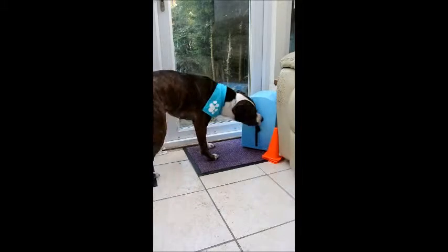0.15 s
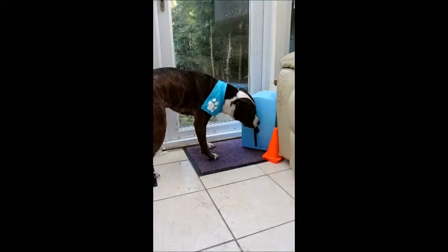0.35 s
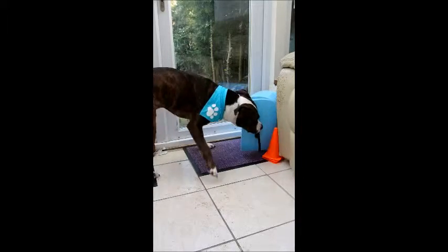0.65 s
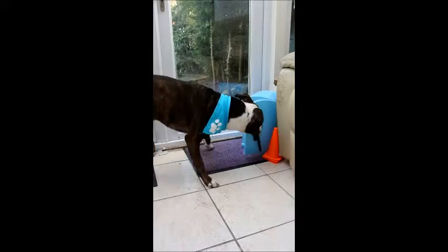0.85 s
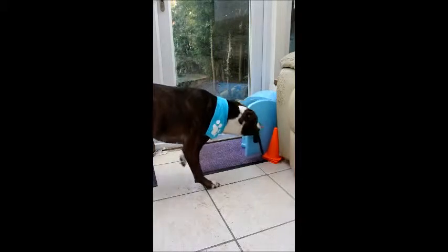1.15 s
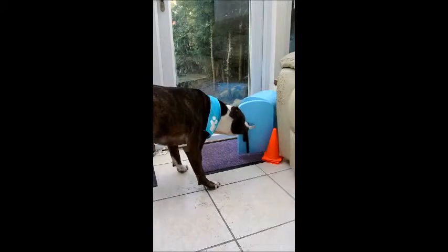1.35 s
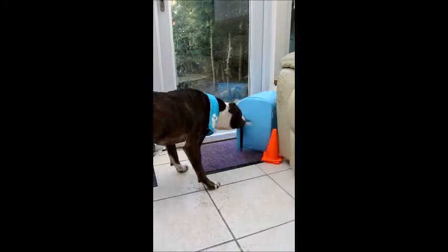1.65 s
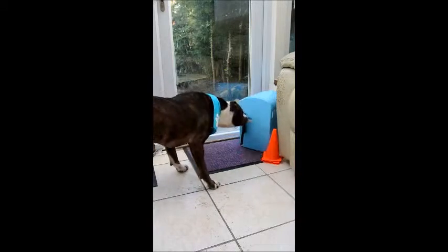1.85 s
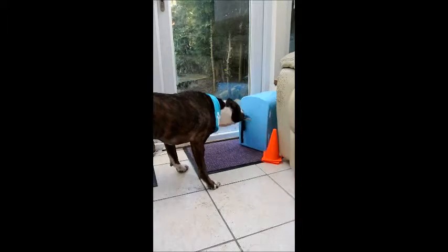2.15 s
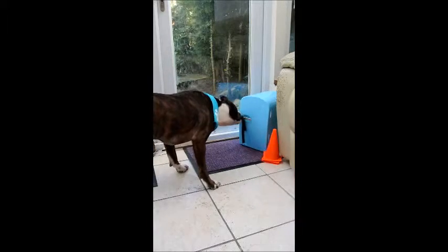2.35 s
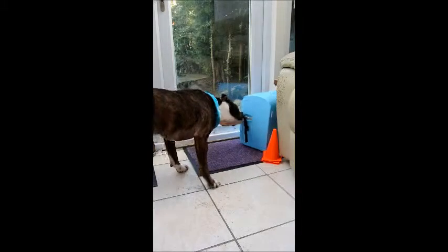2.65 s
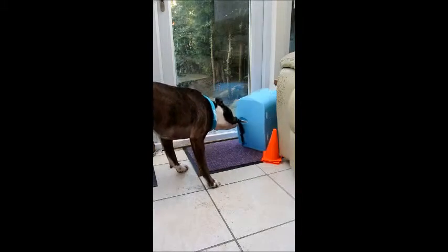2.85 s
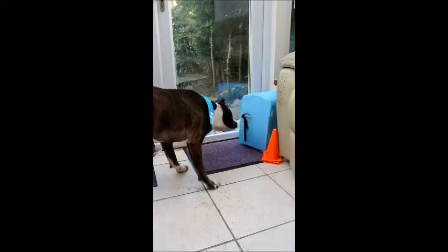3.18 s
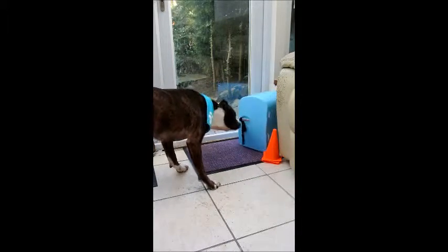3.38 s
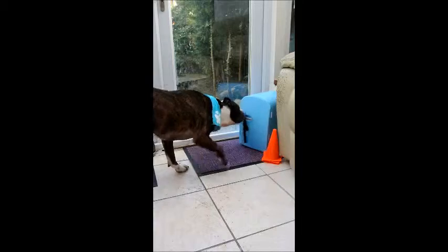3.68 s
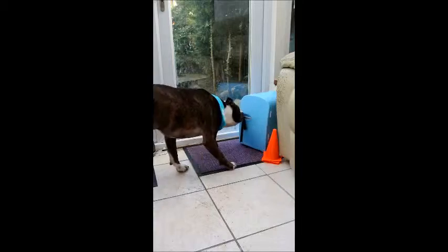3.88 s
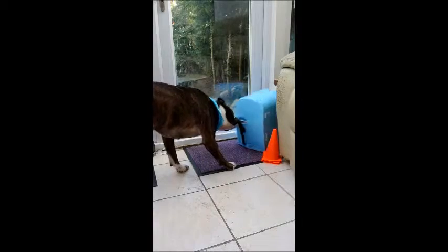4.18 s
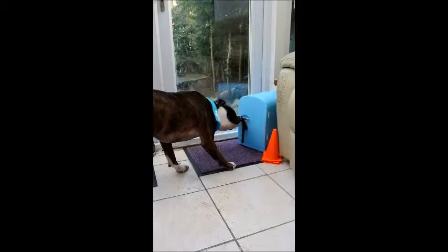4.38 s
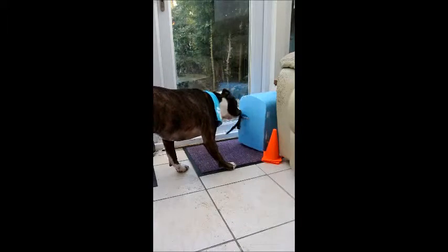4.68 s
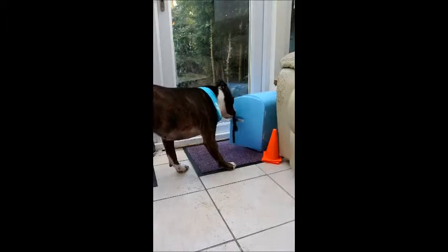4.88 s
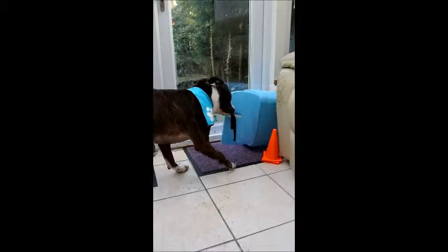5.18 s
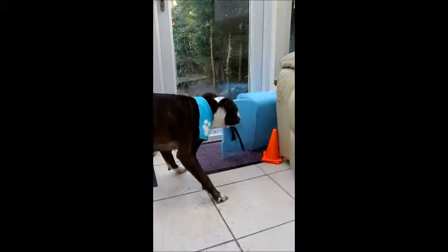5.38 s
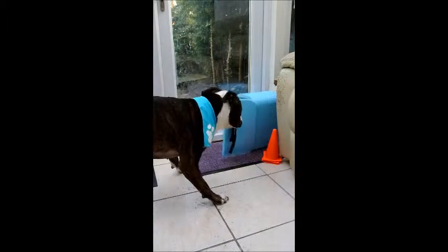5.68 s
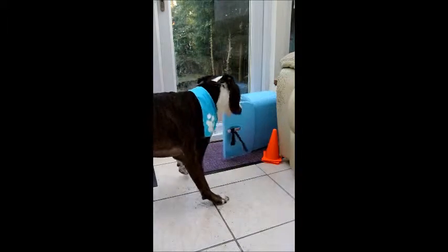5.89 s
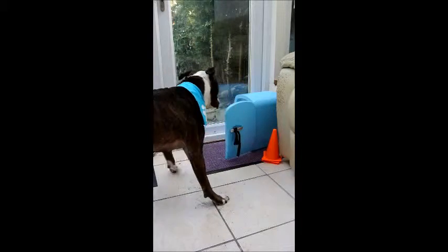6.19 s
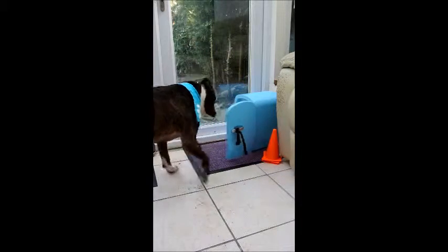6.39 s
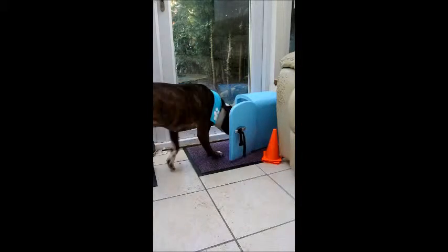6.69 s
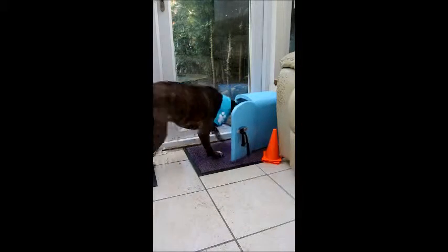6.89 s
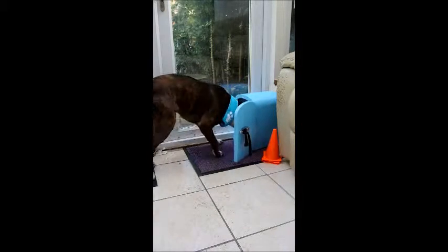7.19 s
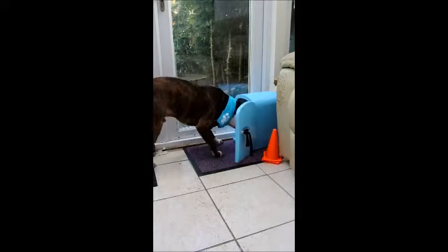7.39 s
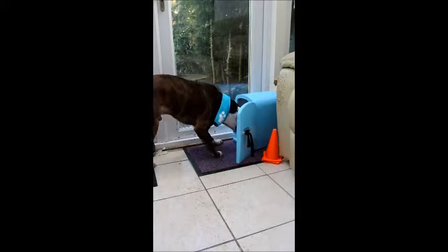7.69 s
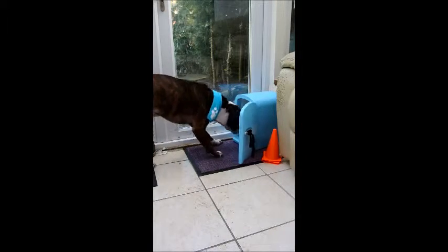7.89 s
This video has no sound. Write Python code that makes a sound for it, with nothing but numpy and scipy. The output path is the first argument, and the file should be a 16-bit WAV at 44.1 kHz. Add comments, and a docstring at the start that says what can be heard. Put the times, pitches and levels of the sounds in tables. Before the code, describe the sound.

A dog tugs at the door of a small plastic fridge, making irregular hollow knocks, thuds and short scrapes as it drags over a mat. Claws click on the tiles and paws brush softly across the mat. Near the end, the loudest knocks ring from inside the open fridge, with a few thin pings. A phone about two metres away picks up the hard room's reflections and a faint hiss.

```python
"""Hollow plastic knocks, thuds and scrapes: a dog tugs at the door of a small fridge in a tiled room.
Blows ring the shell and pulls drag it over its mat; the loudest land near the end, inside the open fridge.
Claws click on the tiles, paws and fur brush the mat, and a small hard part pings thinly.
Hard walls return every sound to a stereo phone two metres away, over a faint steady hiss."""
import sys
import numpy as np
from scipy import signal
from scipy.fft import rfft, irfft
from scipy.io import wavfile
from scipy.ndimage import uniform_filter1d

SR = 44100
rng = np.random.default_rng(int(sys.argv[2]) if len(sys.argv) > 2 else 0)


def dump(signal):
    """Clip the signal to [-1, 1] and save it as 16-bit WAV at the path in sys.argv[1]."""
    limited = np.clip(np.atleast_2d(signal).T, -1, 1)
    pcm = np.round(limited * 32767).astype(np.int16)
    wavfile.write(sys.argv[1], SR, pcm)


N = 354559


def knocks(walls):
    """A blow rings the fridge's upper modes, thuds in the lower ones and cracks on the plastic."""
    # Blows on the fridge. Each row: start in seconds, ring peak in dB, ring centre in Hz, thud in dB
    # against the ring, thud centre in Hz, crack in dB against the ring, damping factor of jaw and mat.
    blows = [(0.186, -30.5, 670, -10, 134, 6.5, 1.9), (0.326, -29.5, 495, 3, 148, -6, 0.84),
             (0.409, -19.5, 740, -3, 206, -6, 0.8), (0.524, -20, 835, 1, 233, -3.5, 0.99),
             (0.962, -31, 855, 9, 334, -2, 0.6), (1.227, -35.5, 487, 10, 298, 10, 1.1),
             (1.545, -20, 690, 0, 400, -17, 1.56), (1.84, -30.5, 520, 8.5, 194, -8, 1.1),
             (1.865, -20, 840, 9.5, 147, 9, 1.4), (1.88, -18.5, 440, 8.5, 408, 1, 2.06),
             (1.902, -23, 580, 3, 250, -7, 3.3), (2.177, -40.5, 640, 1, 153, 10, 1),
             (2.348, -31, 780, -8, 156, -5, 0.59), (2.556, -32, 610, 11.5, 168, -8, 1.4),
             (3.053, -16, 944, -1, 173, 4.5, 0.77), (3.201, -18.5, 680, -5, 367, 9, 1.7),
             (3.225, -33.5, 506, 15, 330, 22, 0.98), (3.324, -16, 526, -8.5, 156, -9, 0.92),
             (3.599, -26.5, 595, -14, 151, 3.5, 1.4), (3.783, -19.5, 900, -17, 191, 4.5, 1.2),
             (4.363, -21.5, 700, -1, 443, -4.5, 1.0), (4.382, -16, 533, -8, 156, 0.5, 1.6),
             (4.478, -31.5, 1070, -8, 118, 9, 1), (4.556, -17.5, 600, -12, 313, -9, 1.6),
             (4.713, -36.5, 530, 5, 151, -9, 0.31), (4.772, -15, 517, 3, 165, 3, 1.2),
             (4.994, -34, 595, 7, 380, 4, 1.3), (5.246, -9.5, 780, -10.5, 340, -3, 0.83),
             (5.269, -9.5, 730, -28, 326, -13, 1.7), (5.345, -26, 880, 2, 300, -4, 0.67),
             (5.867, -25, 870, -7, 306, -3, 1.3), (6.766, -27.5, 810, -27, 371, -18, 1.2),
             (6.864, -50, 533, 17, 156, -4, 0.85), (6.957, -33, 860, -3, 216, 9.5, 0.69),
             (7.145, -34, 446, -9, 300, 0.5, 0.57), (7.185, -21.5, 880, -31, 223, 1, 0.71),
             (7.196, 4.5, 734, -12.5, 378, -20, 1.9), (7.482, -18.5, 716, -22, 375, -31, 0.99),
             (7.49, 3, 796, -15.5, 356, -8, 1.57), (7.752, -22.5, 670, -8, 330, 7, 0.14),
             (7.92, -28.5, 720, -1, 303, 5, 0.8)]
    crack_hz = 2100
    inside_s, hollow_db = 7.16, 13.5  # from here on, blows land inside and the hollow rings louder
    out, t = np.zeros((2, N)), np.arange(int(.3 * SR)) / SR

    def plastic(x):
        return band(x, 850, 3120) + 0.43 * band(x, 0.85 * crack_hz, 0.995 * crack_hz)

    for start, db, hz, thud_db, thud_hz, crack_db, damping in blows:
        length = 1 / max(damping, .4)
        shell = ring(t, hz, octaves=0.44, length=length, hollow_db=hollow_db * (start > inside_s))
        thud = ring(t, thud_hz, octaves=0.92, length=0.91 * length)
        body = unit(shell) + undb(thud_db) * unit(thud)
        add(out, start, room(walls, undb(db) * body, wet_db=-4))
        add(out, start, undb(db + crack_db) * contact(walls, plastic, t60=0.057, wet_db=1.27))
    return out


def ring(t, centre_hz, octaves, length, hollow_db=0):
    """The fridge's modes ring out; the place of contact favours those near one pitch."""
    # Modes of the fridge. Each row: pitch in Hz, relative level in dB, and seconds to fall 60 dB,
    # which length then scales.
    modes = [(87, -4, 0.12), (118.6, -3, 0.12), (156, -1, 0.26), (199, -3.5, 0.14), (245, 1, 0.04),
             (306.3, 2, 0.1), (317.5, -3.5, 0.13), (353.7, 3, 0.083), (428, -8, 0.27), (493, -3.5, 0.15),
             (537, 0, 0.04), (595, -6, 0.32), (636.7, -7.5, 0.21), (677, -8, 0.1), (788.3, 1.5, 0.099),
             (869.7, -2, 0.1), (944, 5.5, 0.053), (1070, 8, 0.085), (1200, 3.5, 0.31), (1353, 13, 0.13)]
    hollow_hz, hollow_octaves = 600, 0.14
    hz, db, t60 = np.transpose(modes)[:, :, None]
    db = db - 10 * (np.log2(hz / centre_hz) / octaves) ** 2
    db = db + 1.5 * rng.standard_normal(hz.shape)  # no two contacts sound alike
    db = db + hollow_db * np.exp(-(np.log2(hz / hollow_hz) / hollow_octaves) ** 2)
    sign = rng.choice([-1, 1], hz.shape)
    audible = db[:, 0] > db.max() - 45
    hz, db, t60, sign = (column[audible] for column in (hz, db, t60, sign))
    attack = sign * np.minimum(t * hz, 1)  # the swing builds up over one cycle
    return np.sum(undb(db) * attack * fade(t, t60 * length) * np.sin(2 * np.pi * hz * t), axis=0)


def claws(walls):
    """A hard tip on glazed tile: a brief bright chatter around its own pitch."""
    # Claws on tile and catch. Each row: start in seconds, dry peak in dB, centre in Hz,
    # gain of the low band in dB.
    clicks = [(0.187, -34.5, 6100, 5), (0.408, -18, 4850, 6), (0.7543, -8.5, 8700, -4.5),
              (0.524, -28, 6000, 3), (0.9596, -19.5, 5300, 6), (1.124, -12.5, 9200, -45),
              (1.131, -18, 9100, -35), (1.3271, -16, 7800, 4.5), (1.3398, -11.5, 5600, -32),
              (1.8419, -16.5, 7100, 5), (1.8682, -4, 4600, -5), (1.9035, 5, 10830, 5),
              (2.5556, -31, 9100, 9.5), (3.051, -9.5, 8240, 1), (3.201, -12.5, 4570, 11.5),
              (3.737, -44, 4710, 16), (3.7816, -19.5, 5970, -8), (4.384, -36, 5840, 1),
              (4.75, -30, 10900, 8.5), (4.773, -20, 5740, 5.5), (5.247, -32, 7500, -1),
              (5.341, -32, 6580, -20), (5.4002, -11, 8740, -35), (5.512, -35, 6000, -24),
              (5.5386, -32, 7050, -25), (6.246, -19.5, 5700, -6), (6.386, -24.5, 9200, -30),
              (6.679, -29, 6170, -20), (6.6997, -21.5, 8550, -21), (7.195, 0, 5170, 17.5),
              (7.4875, -6.5, 7400, 12.5), (7.6052, -7, 5500, 39), (7.763, 9, 5430, -2)]
    out = np.zeros((2, N))
    for start, db, hz, low_db in clicks:
        def tile(x):
            tick = 0.68 * band(x, 0.893 * hz, 1.063 * hz) + band(x, 0.58 * hz, 1.41 * hz)
            return tick + 0.85 * band(x, 5040, 11200) + undb(low_db) * band(x, 1230, 4280)

        wet_db = -1 - 0.4152 * db  # fainter claws are more hidden: more of them is room
        add(out, start, undb(db) * contact(walls, tile, t60=0.032, wet_db=wet_db))
    return out


def contact(walls, colour, t60, wet_db):
    """A brief chatter of touches; the walls blur it into one smooth burst of the same colour."""
    t = np.arange(1024) / SR
    touches = rng.standard_normal(len(t)) * (rng.random(len(t)) < .15) * fade(t, t60)
    touches[0] = 1.97  # a firm first hit
    click = unit(colour(touches))
    blur = colour(signal.unit_impulse(len(t)))
    blur *= np.sqrt(np.sum(click ** 2) / np.sum(blur ** 2))  # as much energy as the click
    return room(walls, click, wet_db, send=blur)


def drags(walls):
    """Stick-slip on the mat shakes the shell's modes and grates above them."""
    # Pulls that drag the fridge. Each row: start in seconds, hold in seconds, shell level in dB,
    # then grit and rumble, both in dB against the shell.
    pulls = [(0.218, 0.15, -41.5, -11, -5.5), (0.433, 0.03, -38.5, -4, 0), (0.592, 0.12, -51, -3, -0.5),
             (2.037, 0.025, -45.5, -0.5, -22), (2.193, 0.059, -40, -10.5, -9.5),
             (2.336, 0.033, -42.5, -2.5, -5), (3.214, 0.071, -33.5, 6.5, 2),
             (3.315, 0.045, -26.5, -9.5, -13), (3.603, 0.18, -38, -2.5, -13),
             (3.817, 0.056, -33.5, -9.5, -14), (4.401, 0.039, -32, -7.5, -6.5), (4.489, 0.03, -48, 12, 7),
             (4.578, 0.02, -32, -10.5, -7.5), (4.789, 0.034, -31, -8, 1.5), (4.86, 0.049, -37.5, -9, -6),
             (4.966, 0.062, -36.5, -11, -18), (5.073, 0.1, -49, -1, -0.5), (5.187, 0.027, -43.5, -3, -15),
             (5.257, 0.023, -25, -9, -11), (5.312, 0.15, -42.5, -0.5, -6.5), (5.524, 0.04, -44, -2.5, -7),
             (5.886, 0.018, -47, 2.5, -6), (5.972, 0.14, -48, -5, -4), (6.89, 0.17, -61, 8, -6),
             (7.799, 0.044, -26, -10, -26), (7.882, 0.024, -40, -2.5, -26)]
    out, t = np.zeros((2, N)), np.arange(int(.25 * SR)) / SR
    for start, hold, db, grit_db, rumble_db in pulls:
        begin, gain = stroke(start, hold, rise_db_s=1197, fall_db_s=260)
        size = len(gain)
        slips = rng.standard_normal((2, size)) * flutter(size, rate_hz=70, depth_db=2.5)
        shell = signal.fftconvolve(slips[0], ring(t, centre_hz=601, octaves=0.55, length=0.85))[:size]
        rumble = signal.fftconvolve(slips[1], ring(t, centre_hz=267, octaves=1, length=1))[:size]
        grit_hz = 2080 * 2 ** ((db + grit_db + 37.5) / 25)  # grit 25 dB louder grates an octave higher
        grit = rubbing(size, grit_hz, lowest_hz=900, focus_db=12, rate_hz=90, depth_db=3.5)
        scrape = level(shell, 0) + level(rumble, rumble_db) + undb(grit_db) * grit
        add(out, begin, room(walls, gain * undb(db) * scrape, wet_db=-5.5))
    return out


def brushes(walls):
    """Paws and fur sweep the mat, and the fine fibres rustle."""
    # Sweeps over the mat. Each row: start in seconds, hold in seconds, level in dB, # centre in Hz (each sweep
    # has its own).
    sweeps = [(0.0, 0.0038, -36.5, 6240), (0.094, 0.01, -55, 6000), (0.855, 0.075, -46.5, 6800),
              (2.614, 0.0091, -48, 6300), (2.722, 0.12, -44, 6170), (2.906, 0.1, -50.5, 6800),
              (3.686, 0.011, -43, 7140), (4.591, 0.074, -50.5, 6300), (4.861, 0.02, -47, 6200),
              (4.921, 0.039, -42, 7400), (5.019, 0.099, -51, 7000), (5.124, 0.045, -40, 8400),
              (5.702, 0.022, -47.5, 7300), (5.789, 0.023, -47, 7900), (6.049, 0.013, -52, 6500),
              (6.26, 0.04, -65, 6000), (6.456, 0.0055, -34.5, 8800), (6.732, 0.035, -41, 7400),
              (6.862, 0.022, -48.5, 6430), (7.135, 0.012, -47.5, 7000), (7.787, 0.045, -38, 4970)]
    out = np.zeros((2, N))
    for start, hold, db, hz in sweeps:
        begin, gain = stroke(start, hold, rise_db_s=451, fall_db_s=267)
        rustle = rubbing(len(gain), hz, lowest_hz=2830, focus_db=1.9, rate_hz=54, depth_db=0.49)
        add(out, begin, room(walls, gain * undb(db) * rustle, wet_db=0.095))
    return out


def stroke(start, hold, rise_db_s, fall_db_s):
    """Onset and envelope of one movement: it swells from -40 dB up to its start, holds, then dies away."""
    begin = max(start - 40 / rise_db_s, 0)
    t = np.arange(begin, start + hold + 40 / fall_db_s, 1 / SR)
    slopes_db = np.minimum(rise_db_s * (t - start), fall_db_s * (start + hold - t))
    return begin, undb(np.minimum(0, slopes_db))


def rubbing(size, centre_hz, lowest_hz, focus_db, rate_hz, depth_db):
    """Friction noise held at an even level: six bands flicker separately, strongest near the centre."""
    sound = 0
    for hz in lowest_hz * 2 ** np.arange(0, 3, .5):
        noise = level(band(rng.standard_normal(size), hz / 1.89, hz * 1.11), 0)
        weight = undb(-focus_db * np.log2(hz / centre_hz) ** 2)
        sound = sound + weight * noise * flutter(size, rate_hz, depth_db)
    return sound / np.sqrt(uniform_filter1d(sound ** 2, 2048))


def flutter(size, rate_hz, depth_db):
    """Uneven gain: friction catches and slips."""
    step = int(SR / rate_hz)
    jumps = np.repeat(rng.standard_normal(size // step + 1), step)[:size]
    return undb(depth_db * uniform_filter1d(jumps, step))


def pings(walls):
    """A small hard part, perhaps a collar tag, rings with one thin fading tone."""
    # Taps on the part. Each row: start in seconds, dry peak in dB.
    taps = [(7.6051, -22.5), (7.764, -29), (7.9219, -38)]
    ping_hz = 3534
    out, t = np.zeros((2, N)), np.arange(int(.3 * SR)) / SR
    tone = fade(t, t60=0.094) * np.sin(2 * np.pi * ping_hz * t)
    for start, db in taps:
        add(out, start, room(walls, undb(db) * tone, wet_db=-1.3))
    return out


def reflections():
    """Dense wall reflections as noise, split at 5 kHz into a dull part and a treble part."""
    noise = wide_noise(4 * SR, split_hz=1070, side_db=-8, treble_side_db=-3)
    dull = signal.sosfilt(signal.butter(2, 5000, fs=SR, output="sos"), noise)
    return dull, noise - dull


def room(walls, direct, wet_db, send=None):
    """Direct sound, a near wall, then a diffuse tail that differs from place to place."""
    build_up_s, wall_echo_s = 0.0032, 0.0125
    t = np.arange(int(.4 * SR)) / SR
    place = rng.integers(3 * SR)
    dull, treble = (part[:, place:place + len(t)] for part in walls)
    tail = dull * fade(t, t60=0.3) + treble * fade(t, t60=0.28)
    tail *= np.clip(t / build_up_s, 0, 1)
    tail *= 1 + 0.38 * np.exp(-((t - wall_echo_s) / 0.0011) ** 2)
    tail *= undb(wet_db) / np.sqrt(np.sum(tail ** 2) / 2)
    sound = signal.fftconvolve((direct if send is None else send)[None], tail, axes=1)
    sound[:, :len(direct)] += direct
    return sound


def hiss():
    """A faint steady bed of air and microphone noise."""
    # Colour of the hiss. Each row: frequency in Hz, relative level in dB.
    spectrum = [(15, -34), (25, -1), (170, 0), (363, 2.5), (416, -1.5), (489, 3.5), (677, 0.5), (1230, 0),
                (1330, 3), (1440, -4), (2610, -7), (9840, -10.5), (16000, -14.5)]
    hz, db = np.transpose(spectrum)
    bins_hz = np.maximum(np.fft.rfftfreq(N, 1 / SR), 1)
    colour = undb(np.interp(np.log(bins_hz), np.log(hz), db))
    noise = wide_noise(N, split_hz=510, side_db=-4, treble_side_db=-7.5)
    return level(irfft(rfft(noise) * colour, N), db=-44)


def wide_noise(size, split_hz, side_db, treble_side_db):
    """Stereo noise, alike in the bass and nearly unrelated in the treble."""
    mid, side = rng.standard_normal((2, size))
    treble = signal.sosfilt(signal.butter(2, split_hz, "high", fs=SR, output="sos"), side)
    side = undb(side_db) * side + undb(treble_side_db) * treble
    return np.array([mid + side, mid - side]) / np.sqrt(2)


def undb(db):
    """Gain of a level in dB."""
    return 10 ** (np.asarray(db) / 20)


def unit(x):
    """Scale to a peak of one."""
    return x / np.max(np.abs(x))


def level(x, db):
    """Scale to an rms level."""
    return x * undb(db) / np.sqrt(np.mean(x ** 2))


def band(x, lo_hz, hi_hz):
    """Band-pass."""
    return signal.sosfilt(signal.butter(2, [lo_hz, min(hi_hz, .45 * SR)], "band", fs=SR, output="sos"), x)


def fade(t, t60):
    """Decay by 60 dB in t60 seconds."""
    return np.exp(-np.log(1000) * t / t60)


def add(out, start_s, sound):
    """Mix a sound in at its start time."""
    i = int(start_s * SR)
    sound = sound[:, :N - i]
    out[:, i:i + sound.shape[1]] += sound


def scene():
    """Dog and fridge share one tiled room, over the hiss."""
    walls = reflections()
    return knocks(walls) + claws(walls) + drags(walls) + brushes(walls) + pings(walls) + hiss()


def record(dry):
    """The phone drops the deep bass, clips at full scale and cuts the top."""
    bottom_hz, top_hz = 30, 15700
    thin = signal.sosfilt(signal.butter(1, bottom_hz, "high", fs=SR, output="sos"), dry)
    return signal.sosfilt(signal.ellip(8, .2, 70, top_hz, fs=SR, output="sos"), np.clip(thin, -1, 1))


dry = scene()
out = record(dry)
dump(out)
```